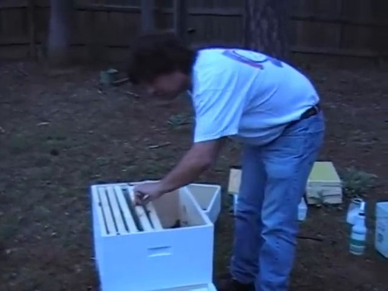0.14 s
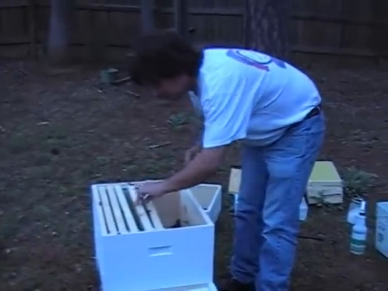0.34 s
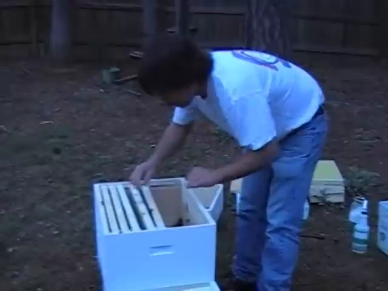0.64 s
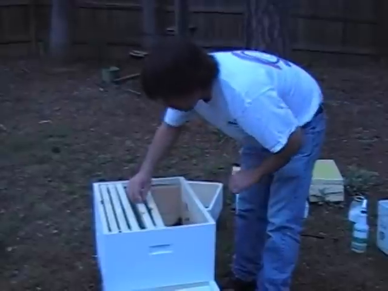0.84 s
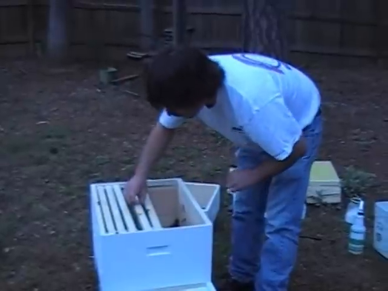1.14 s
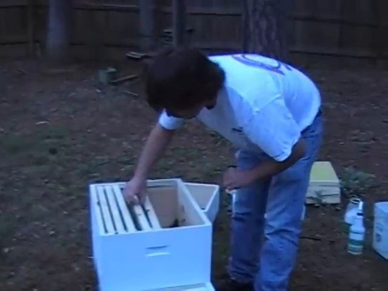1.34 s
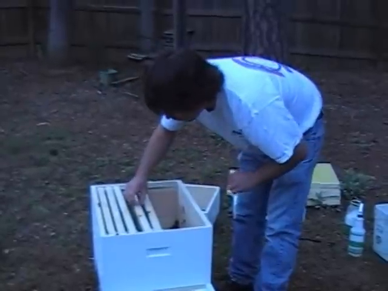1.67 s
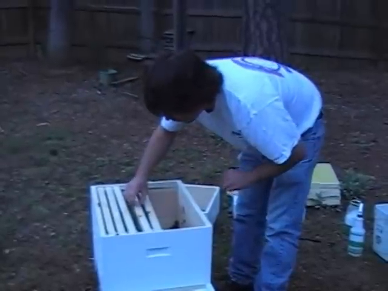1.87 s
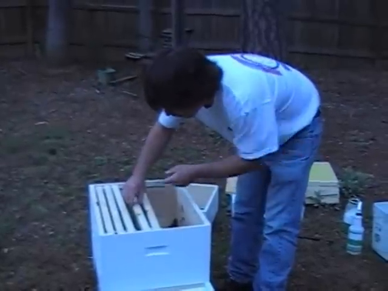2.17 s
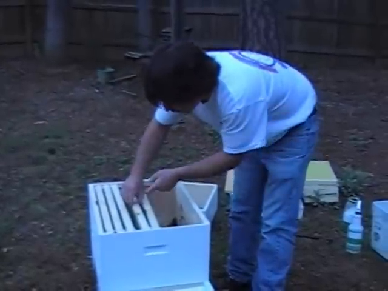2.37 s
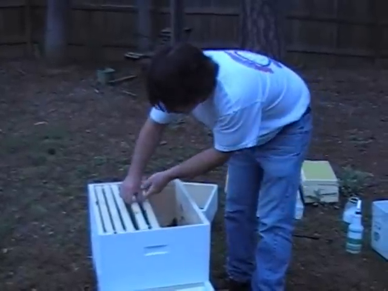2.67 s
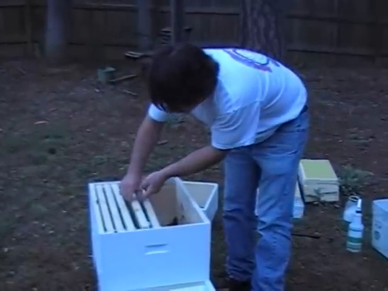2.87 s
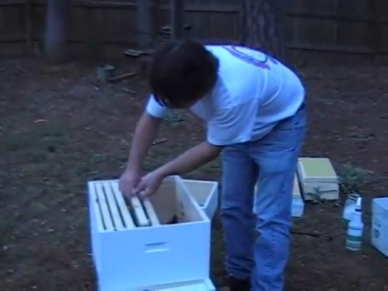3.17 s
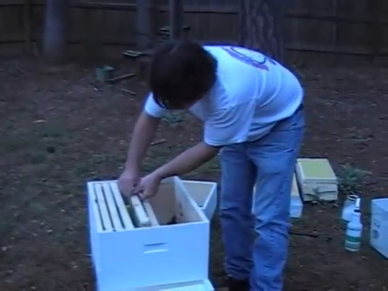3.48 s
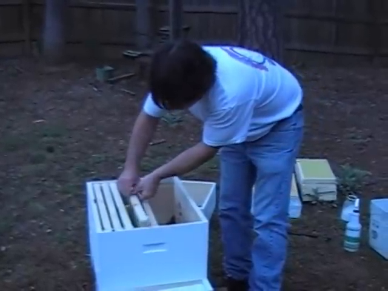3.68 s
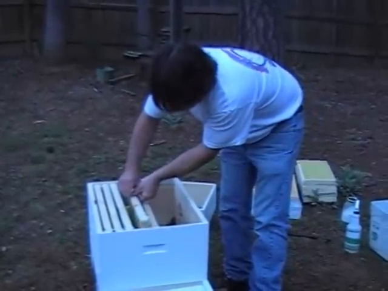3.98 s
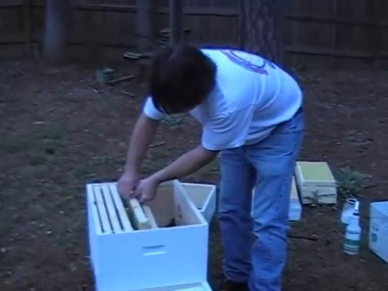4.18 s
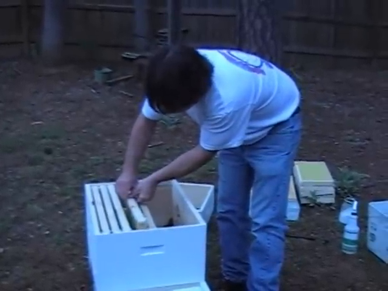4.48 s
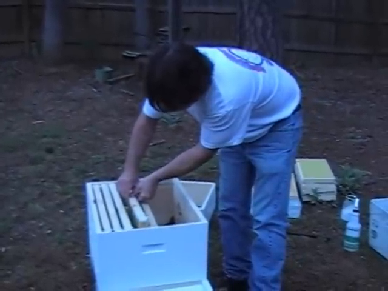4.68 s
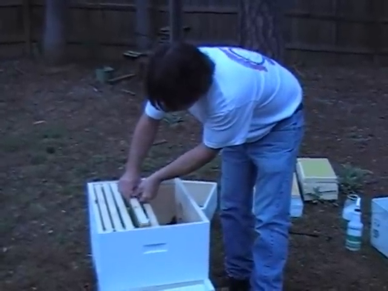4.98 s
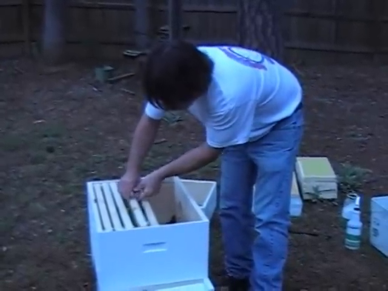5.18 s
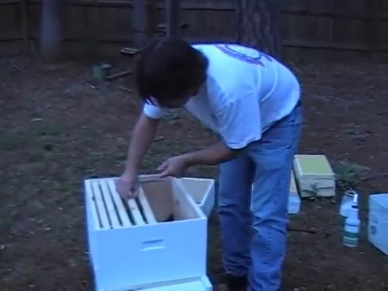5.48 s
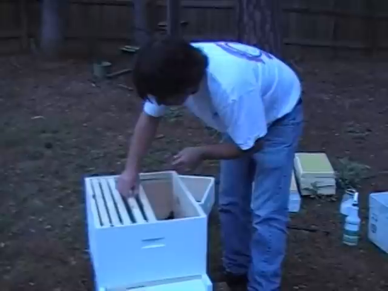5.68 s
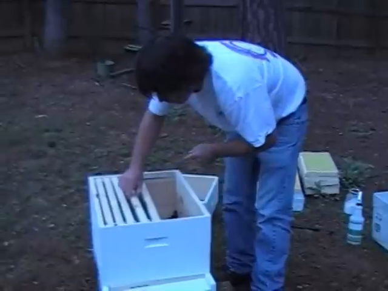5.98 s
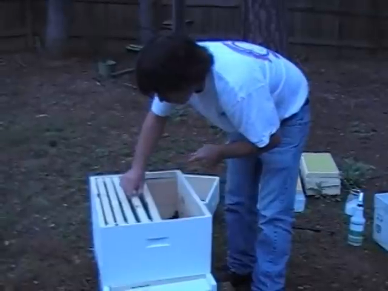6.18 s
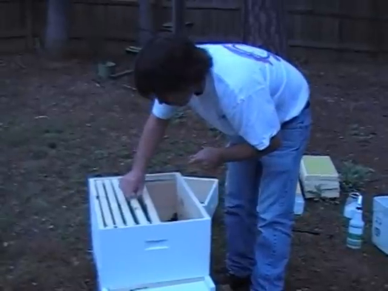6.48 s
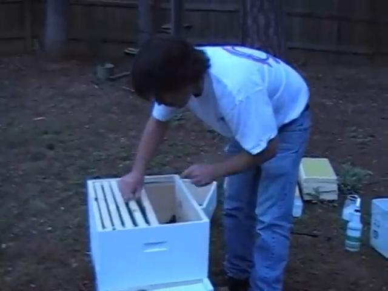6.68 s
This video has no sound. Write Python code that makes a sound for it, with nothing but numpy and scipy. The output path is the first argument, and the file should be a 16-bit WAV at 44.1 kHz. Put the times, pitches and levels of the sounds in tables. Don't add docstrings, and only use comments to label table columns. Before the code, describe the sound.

A backyard heard through a small camcorder microphone: steady, wide hiss of far traffic and leaves, gently flickering, with very faint low engine drones and a thin motor whine. From 0.4 s small bird chips appear; from 0.9 to 2 s a songbird whistles a quick tumbling phrase about three times, clear and high, trailing echoes among trees. A light knock and snap of wood fall at 1.1 s. At 2.5 s comes a firm, dull knock on a hollow box, then softer thuds and a scrape near 3.5 s. Two hard, dry wooden cracks stand out at 3.65 and 4.01 s, the second with a short hollow rattle. A distant car swells faintly around 4.6 s. From 4.5 to 5.9 s a farther bird answers in three bursts of chirps, with a tiny ratcheting creak at 5.1 s. Afterwards only hiss, leaves and barely felt wind bumps remain.

```python
import sys
import numpy as np
from scipy import signal
from scipy.fft import rfft, irfft, next_fast_len
from scipy.io import wavfile
from scipy.ndimage import uniform_filter1d

SR = 44100
rng = np.random.default_rng(int(sys.argv[2]) if len(sys.argv) > 2 else 0)


def volts(x):
    e = np.asarray(x, float) / 20
    return 10 ** e


def store_pcm(level_fs):
    pcm = np.round(np.clip(level_fs, -1, 1) * 32767).astype(np.int16)
    wavfile.write(sys.argv[1], SR, np.atleast_2d(pcm).T)


N = 301199
TIME = np.arange(N) / SR


def along(table, hz):
    f, v = np.transpose(table)
    return np.interp(np.log(hz + 1), np.log(f + 1), v)


def fade(table):
    return np.interp(TIME, *np.transpose(table))


def band(x, hz, width):
    return signal.lfilter(*signal.iirpeak(hz, hz / width, SR), x)


def add(out, s, sound, pan_db=0.):
    i = int(s * SR)
    sides = volts(np.array([[pan_db], [-pan_db]]) / 2)
    out[:, i:i + sound.shape[-1]] += (sides * sound)[:, :N - i]


def walk(rate):
    k = int(SR / rate)
    held = np.repeat(rng.standard_normal(N // k + 1), k)
    return uniform_filter1d(uniform_filter1d(held, k), k)[:N]


def tone(hz):
    return np.sin(2 * np.pi * np.cumsum(hz) / SR)


# [f/Hz, level/dB per Hz]
WASH = [(12, -63), (20, -29), (64, -20.5), (109, -14), (272, -8.5), (366, -4), (480, -1), (645, -1),
        (1080, -2), (1260, -5.5), (1790, -10), (2760, -15.5), (4480, -19), (5400, -16.5), (6710, -12.5),
        (8500, -18), (10300, -25.5), (12500, -28), (16200, -59), (22000, -120)]
# [f/Hz, side minus mid/dB]
SIDE = [(60, 5), (110, -10), (190, -2), (350, -5.5), (630, -7), (1140, -6.5), (2050, -5), (3700, -6),
        (6670, -13), (8600, -5.5), (12000, -10.5)]
# [t/s, level/dB]
SWELL = [(0, -0.4), (2.1, 0.7), (3.4, -0.5), (5.1, 0.86), (6.83, 1.5)]
# [t/s, level/dB]
RUSTLE = [(0, 1.3), (2.2, 1.26), (3.3, 1.5), (4.0, 0.9), (4.3, 1.5), (5.1, 2.5), (5.45, 2.4), (6.83, 2)]


def yard():
    traffic, leaves = fade(SWELL), fade(RUSTLE)
    hz = np.fft.rfftfreq(N, 1 / SR)
    mid = rfft(rng.standard_normal(N)) * volts(along(WASH, hz))
    side = rfft(rng.standard_normal(N)) * volts(along(WASH, hz) + along(SIDE, hz))
    out = 0
    for octave in range(-1, 10):
        distance = np.clip(np.log2(hz / 31.25 + 1e-9) - octave, -1, 1)
        share = np.cos(np.pi / 2 * distance) ** 2
        high = np.clip((octave - 5) / 2, 0, 1)
        flicker = 1.28 * walk(5.5) + 0.77 * walk(25)
        gain = volts((0.5 - high) * traffic + high * leaves + flicker)
        m, d = irfft(mid * share, N), irfft(side * share, N)
        out = out + gain * np.array([m + d, m - d])
    return volts(-36.5) * out


def road():
    from_db, to_db = -62, -59
    car_s, car_db, pass_s = 4.58, -55.5, 0.59
    mid, side = band(band(rng.standard_normal((2, N)), 750, 236), 840, 340)
    roar = np.array([mid + 0.23 * side, mid - 0.15 * side]) / mid.std()
    car = volts(car_db) / (1 + ((TIME - car_s) / pass_s) ** 2)
    steady = volts(from_db + (to_db - from_db) * TIME / TIME[-1])
    return roar * np.hypot(car, steady)


# [t/s, level/dB]
HUM = [(0, -88), (.9, -93), (1.2, -80.5), (4.7, -74.5), (5.3, -86), (6.83, -94)]
# [t/s, level/dB]
MAINS = [(0, -78), (2.0, -82), (2.4, -84), (6.83, -90)]


def drones():
    out = 0
    for hz, levels in [(99.2, HUM), (119.7, MAINS)]:
        level = volts(fade(levels) + 5 * walk(9))
        out = out + level * tone(hz * (1 + 0.0119 * walk(4.08)))
    return np.sqrt(2) * np.array([out, 0.95 * out])


def tape_drive():
    level = volts(-72.5 + 2.1 * walk(15))
    whine = level * tone(1070 * (1 + 0.0084 * walk(20)))
    return np.sqrt(2) * np.array([whine, whine])


# [t/s, length/s, centre f/Hz, level/dB]
SCUFFS = [(0.266, 0.012, 6940, -47.5), (0.695, .2, 7100, -64.5), (3.215, .017, 8300, -54.5),
          (3.219, .008, 5750, -56), (3.535, .007, 5640, -54), (4.5596, 0.0033, 7300, -50),
          (3.6237, .004, 6600, -42), (3.6488, .006, 11000, -46), (4.016, .004, 2900, -40),
          (3.6473, 0.0017, 9000, -49), (3.656, 0.004, 8600, -56), (4.012, 0.0046, 9900, -44),
          (4.034, 0.0028, 9600, -52), (4.03, .003, 8800, -50), (4.563, 0.0034, 7300, -46),
          (4.565, .0062, 7400, -62), (5.654, 0.0051, 8500, -51), (5.655, 0.0083, 7150, -51.5)]


def scuffs():
    out = np.zeros((2, N))
    for s, length, hz, db in SCUFFS:
        n, width = int(1.3 * length * SR), 0.22 * hz
        scrape = np.hanning(n) ** 0.63 * rng.standard_normal(n)
        scrape = np.pad(scrape, (0, 60))
        scrape = band(band(scrape, hz, width), hz, width)
        add(out, s, volts(db) * scrape / scrape.std(), -4.5)
    return out


def whistle(notes):
    out = np.zeros(N)
    for s, length, hz0, hz1, db in notes:
        u = np.linspace(0, 1, int(1.35 * length * SR))
        i = int((s - 0.1 * length) * SR)
        swell = np.sin(np.pi * u) ** 0.5
        out[i:i + len(u)] += volts(db) * np.sqrt(2) * swell * tone(hz0 + (hz1 - hz0) * u)
    return out * volts(2.5 * walk(170))


def sung(calls, direct=False):
    return [(s + late, length, hz0, hz1, db + effort_db + direct * facing_db)
            for s, notes, effort_db, facing_db in calls
            for late, length, hz0, hz1, db in notes]


def among_trees(sent):
    t60_s, side_gain = 1.87, volts(-10.5)
    t = np.arange(int(.7 * SR)) / SR
    decay = volts(-60 * t / t60_s) + 0.7 * volts(-60 * t / .25)
    scatter = rng.standard_normal((2, len(t))) * decay * np.minimum(t / 0.0028, 1)
    scatter = scatter * volts(3.5 * walk(46.4)[:len(t)])
    scatter = scatter * np.cos(np.pi / 2 * t / t[-1])
    scatter = scatter / np.sqrt(np.sum(scatter[0] ** 2))
    analytic = signal.hilbert(sent, next_fast_len(N))[:N]
    smeared = np.real(analytic * np.exp(1.5j * walk(260)))
    mid, side = signal.fftconvolve(smeared[None], scatter, axes=1)[:, :N]
    return np.array([mid + side_gain * side, mid - side_gain * side])


# [t/s, length/s, f/Hz, level/dB]
CHIPS = [(0.401, 0.0143, 3720, -58), (.415, .015, 2580, -60.5), (.533, .015, 4360, -58),
         (.606, .018, 2650, -52), (0.806, .012, 2700, -52), (.91, .023, 4040, -65), (1.02, .05, 2110, -61),
         (1.052, 0.033, 3930, -65), (1.295, 0.029, 3870, -60), (1.358, .05, 3930, -53),
         (1.58, 0.037, 3860, -59), (1.66, .04, 3940, -67), (1.755, .03, 3800, -56), (1.796, .01, 3780, -56),
         (.68, .03, 3150, -66), (.765, .012, 2650, -63), (1.03, .04, 3830, -65), (1.82, .008, 3870, -56),
         (1.83, 0.031, 3700, -59), (1.985, .02, 3790, -58), (4.625, .03, 3830, -66),
         (4.8, 0.056, 2070, -62), (4.843, .015, 2940, -56), (5.51, .03, 3460, -60), (5.565, .02, 3600, -68),
         (5.655, .012, 3440, -59), (5.34, 0.035, 2150, -60), (5.887, 0.037, 2090, -65),
         (5.96, .056, 2095, -61)]
# [t/s, length/s, start f/Hz, end f/Hz, level/dB]
SWOOP = [
    (0.712, 0.049, 3250, 2990, -64),
]
# [t after the start/s, length/s, start f/Hz, end f/Hz, level/dB]
TUMBLE = [(0, 0.008, 3380, 3050, -51), (.011, 0.016, 3020, 2960, -49), (0.031, 0.012, 2540, 2700, -43)]
CREST = [(0, .023, 3340, 3310, -43), (.022, .024, 3300, 3080, -46)]
DRAWL = [(0, 0.036, 2155, 2176, -55), (.04, 0.035, 2177, 2280, -51)]
FLICK = [(0, 0.018, 2660, 2640, -52), (.018, 0.018, 2830, 3010, -44.5), (.043, 0.012, 2680, 2200, -52),
         (.056, 0.024, 2045, 1880, -59)]
DIP = [(0, .016, 2930, 2660, -55), (.015, 0.025, 2650, 2570, -56.5)]
HOOK = [(0, 0.0171, 3670, 3790, -50), (0.015, 0.02064, 3796, 4110, -53.5), (.042, .025, 4180, 4250, -70)]
DROP = [(0, .014, 3800, 3630, -54.5)]
HOLD = [(0, .07, 2880, 2920, -60), (.1, 0.16, 2870, 2914, -65)]
STOOP = [(0, .014, 2760, 2630, -60), (.013, .028, 2610, 2560, -60)]
LIFT = [(0, 0.0213, 2800, 2930, -60)]
TRAIL = [(0, .055, 4200, 4230, -66)]
CHEEP = [(0, .018, 2420, 2600, -62)]
# [t/s, syllable, effort level/dB, direct-path level/dB]
PHRASES = [
    (.916, TUMBLE, -5, -4),
    (.975, CREST, -5.5, -0.5),
    (1.082, DRAWL, -0.5, 0),
    (1.208, FLICK, -1, -0.5),
    (1.367, TUMBLE, -1.5, 1.5),
    (1.424, CREST, -1.5, 1),
    (1.514, DRAWL, 1.5, -0.5),
    (1.66, FLICK, 0.5, 1.5),
    (1.821, TUMBLE, -0.6, 3.5),
    (1.876, CREST, -0.8, 1.5),
]
# [t/s, syllable, effort level/dB, direct-path level/dB]
REPLIES = [(4.522, STOOP, -6, 0), (4.572, DIP, -2.5, 1), (4.615, LIFT, -1, 0), (4.673, HOOK, -2.5, 0.5),
           (4.71, TRAIL, 0, 2), (4.785, DROP, -5, 0), (5.072, STOOP, -8, -1), (5.127, DIP, 2, 1),
           (5.18, LIFT, 0, 0), (5.2, HOLD, 1.5, -2), (5.227, HOOK, 1, 2), (5.324, DROP, -2, 9),
           (5.405, CHEEP, 0, 0), (5.452, CHEEP, 4, -4), (5.612, STOOP, 2, -2), (5.655, LIFT, 1, 3),
           (5.674, DIP, 2, 2), (5.69, STOOP, -9, -2), (5.718, HOOK, -6, -1), (5.73, HOLD, 0, 0),
           (5.773, HOOK, -2.5, 6), (5.882, DROP, 0, 3)]


def birds():
    sag_hz = 50
    chips = [(s, length, hz + sag_hz / 2, hz - sag_hz / 2, db) for s, length, hz, db in CHIPS]
    song, others, answer = whistle(sung(PHRASES)), whistle(chips + SWOOP), whistle(sung(REPLIES))
    sent = volts(1.5) * song + volts(-6) * others + volts(-4) * answer
    song = whistle(sung(PHRASES, direct=True))
    answer = whistle(sung(REPLIES, direct=True))
    return song + volts(-4.5) * (others + answer) + among_trees(sent)


# [t/s, peak level/dB, centre f/Hz, ring/s]
KNOCKS = [
    (1.044, -38, 1070, 0.1),
    (1.132, -35, 920, 0.052),
    (1.142, -38, 454, 0.058),
    (2.456, -30.5, 630, 0.081),
    (2.457, -36, 1200, 0.062),
    (2.466, -37, 1420, 0.13),
    (3.461, -36, 512, 0.091),
    (3.541, -37, 518, 0.17),
]


def knocks():
    out = np.zeros((2, N))
    t = np.arange(int(.15 * SR)) / SR
    for s, db, hz, ring_s in KNOCKS:
        push = rng.standard_normal(len(t)) * volts(-60 * t / ring_s) * np.minimum(t / 0.0038, 1)
        panels = 0.51 * band(push, 526, 250) + 0.14 * band(push, 1540, 1600)
        knock = band(push, hz, 0.054 * hz) + panels
        knock = band(knock, 1040, 2600)
        add(out, s, volts(db) * knock / np.abs(knock).max())
    return out


# [f/Hz, width/Hz, level/dB]
CRACK = [(4700, 250, -14), (6560, 1400, 3.5), (7300, 4500, -3), (10440, 2300, -10)]


def snap(body_hz, body_db, ring_s):
    rattle, apart = 0.11, 0.11
    t = np.arange(int(.06 * SR)) / SR
    mid, side = rng.standard_normal((2, len(t))) * volts(-60 * t / ring_s)
    push = rattle * band(np.array([mid + apart * side, mid - apart * side]), 2500, 5900)
    push[:, 0] += 1
    crack = sum((-1) ** k * volts(db) * band(push, f, w) for k, (f, w, db) in enumerate(CRACK))
    body = band(push, body_hz, 260) + volts(-16) * band(push, 2000, 1600)
    sound = band(crack, 11200, 10000) + volts(body_db) * body
    return sound / np.abs(sound).max()


# [t/s, peak level/dB, body f/Hz, body against crack level/dB, ring/s]
SNAPS = [(1.131, -32, 3300, 1, 0.027), (3.535, -34.5, 3200, -6, 0.047), (3.6243, -48, 3200, -14, .03),
         (3.627, -33, 3250, 14, 0.028), (3.6456, -40, 3300, 11, .02), (3.6485, -16, 3220, -12, 0.025),
         (3.6497, -22.5, 3200, 4, 0.022), (3.6512, -17.5, 3150, 8, 0.027), (3.652, -21.5, 4700, -1, 0.017),
         (3.655, -26.5, 3140, 8, .02), (3.658, -34, 5870, 4, 0.011), (3.695, -35.5, 3200, -7, .02),
         (3.879, -42, 3200, -1, .02), (4.0107, -17.5, 2970, -12, .03), (4.0387, -42, 3120, 8, 0.02),
         (4.0277, -28.5, 4660, -6, 0.04), (4.036, -28, 3200, -5, .025), (4.0133, -27, 4100, 7, 0.033),
         (4.0137, -28, 3220, 9, 0.045), (4.023, -31, 3220, 10, 0.02), (4.031, -36, 2300, 10, .03),
         (4.032, -39, 2540, -4, .03), (4.0315, -25, 3880, 3.5, 0.034), (4.057, -38, 3200, -5, .015),
         (4.049, -51, 3150, 12, .036)]


def snaps():
    out = np.zeros((2, N))
    for s, db, body_hz, body_db, ring_s in SNAPS:
        pan_db = 0 if body_db > 4 else -3.5
        add(out, s, volts(db) * snap(body_hz, body_db, ring_s), pan_db)
    return out


# [t/s, peak level/dB]
BUMPS = [
    (1.38, -68),
    (1.499, -79),
    (1.696, -59),
    (1.935, -68),
    (2.301, -66),
    (5.262, -77),
    (6.044, -70),
    (6.199, -65),
]


def wind_bumps():
    out = np.zeros((2, N))
    n = int(0.1 * SR)
    for s, db in BUMPS:
        gust = np.hanning(n) * band(band(rng.standard_normal((2, n)), 74, 60), 62, 90)
        gust = gust / np.abs(gust.mean(axis=0)).max()
        add(out, s - .02, volts(db) * (gust + 1.2 * (gust - gust[::-1])))
    return out


# [t/s, f/Hz, level/dB, driven for/s, ring/s]
RINGS = [
    (4.0385, 3170, -36, .004, .009),
    (4.026, 4800, -48, .004, .008),
    (4.048, 3150, -46, .002, .012),
    (4.0133, 3750, -36, .0015, .01),
    (4.0106, 10300, -34, .0006, .004),
    (4.0112, 6850, -31, .002, .022),
    (4.0115, 7500, -36, .003, .012),
]


def frame_rings():
    out = np.zeros((2, N))
    t = np.arange(int(.15 * SR)) / SR
    for s, hz, db, driven_s, ring_s in RINGS:
        swell = np.minimum(t / 0.00046, 1) * volts(-60 * np.maximum(t - driven_s, 0) / ring_s)
        add(out, s, volts(db) * np.sqrt(2) * swell * np.sin(2 * np.pi * hz * t))
    return out


# [t/s, level/dB]
CREAK = [
    (5.07, -43),
    (5.09, -42),
    (5.1055, -31),
    (5.1105, -44),
    (5.1165, -33),
    (5.1255, -32.5),
    (5.1303, -44),
]


def creak():
    out = np.zeros((2, N))
    s, db = np.transpose(CREAK)
    for slip in s[-1] - .005 * np.arange(13):
        add(out, slip, volts(np.interp(slip, s, db)) * snap(3450, -6.0, 0.029), -1.5)
    return out


def scene():
    surroundings = yard() + road() + drones() + tape_drive() + wind_bumps()
    handling = scuffs() + knocks() + snaps() + frame_rings() + creak()
    return surroundings + birds() + handling


def band_limit(x):
    return signal.sosfilt(signal.butter(12, 12620, fs=SR, output="sos"), x)


def record(dry):
    cut = signal.ellip(10, .2, 45, 12450, fs=SR, output="sos")
    mix = signal.sosfilt(cut, dry)
    return band_limit(mix)


dry = scene()
out = record(dry)
store_pcm(out)
```